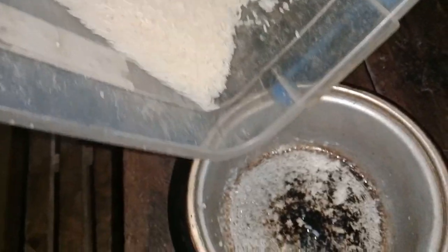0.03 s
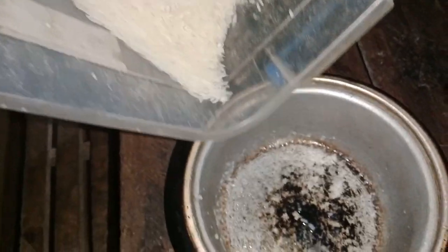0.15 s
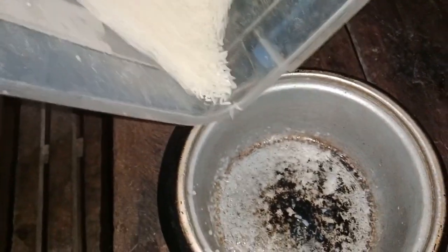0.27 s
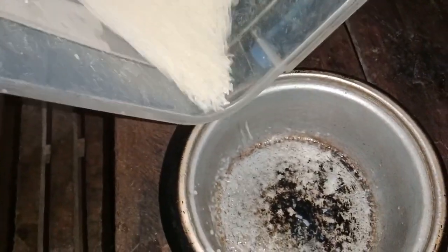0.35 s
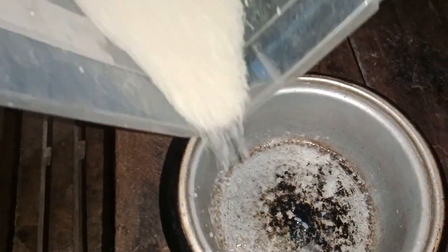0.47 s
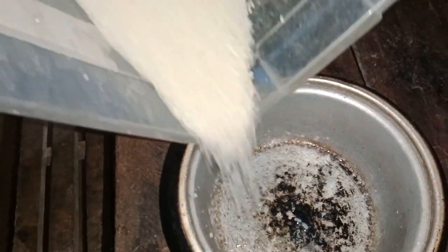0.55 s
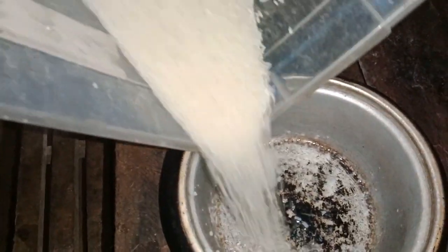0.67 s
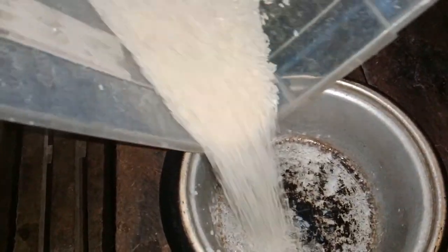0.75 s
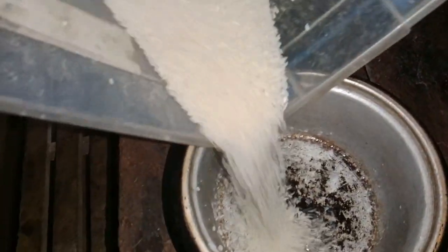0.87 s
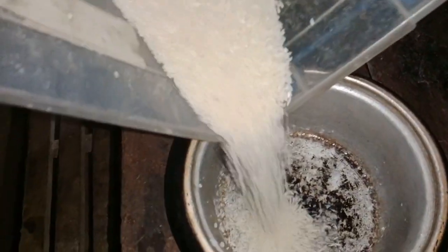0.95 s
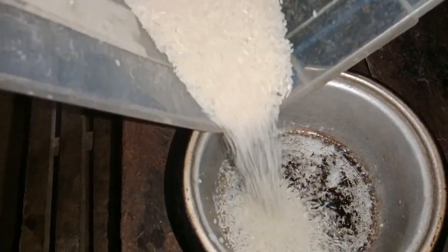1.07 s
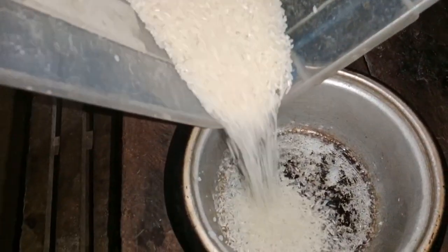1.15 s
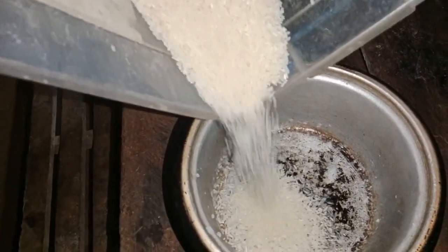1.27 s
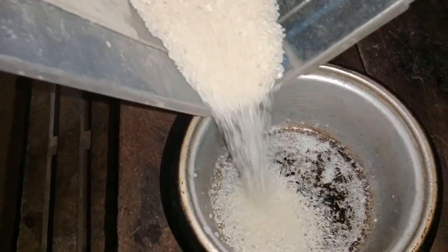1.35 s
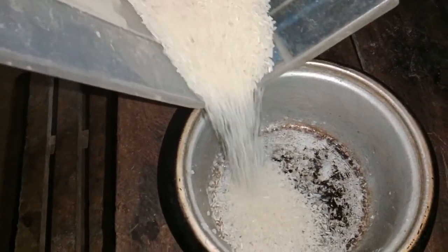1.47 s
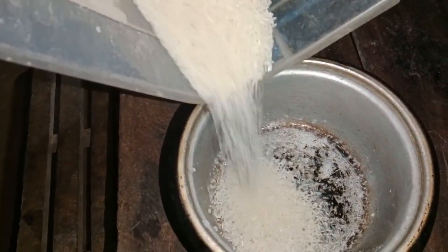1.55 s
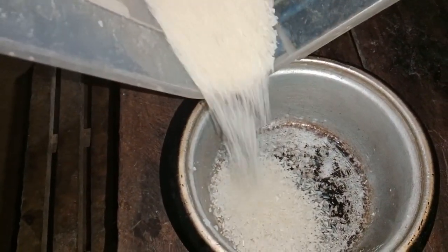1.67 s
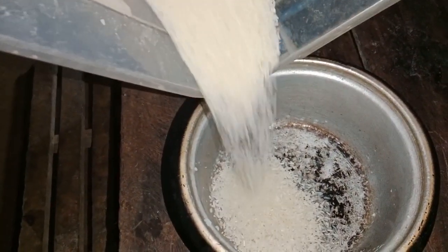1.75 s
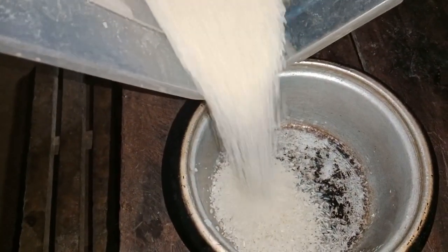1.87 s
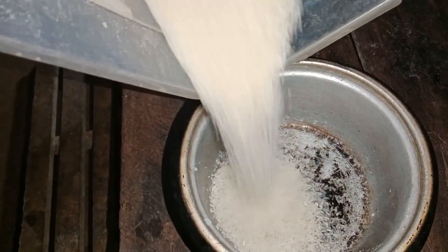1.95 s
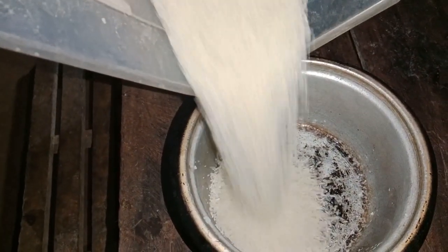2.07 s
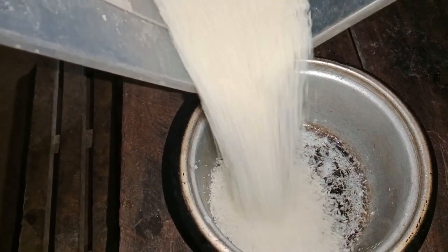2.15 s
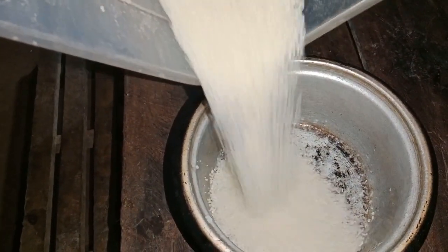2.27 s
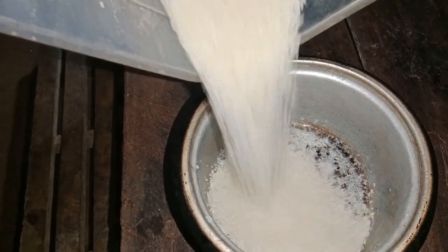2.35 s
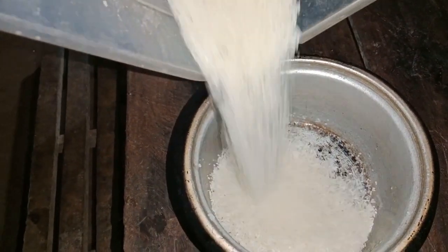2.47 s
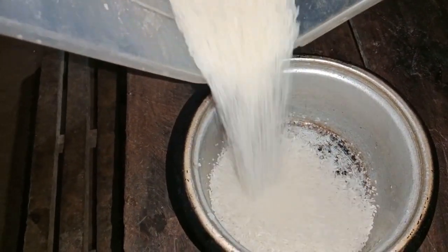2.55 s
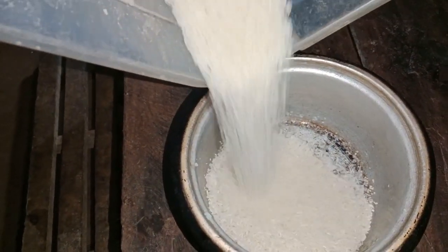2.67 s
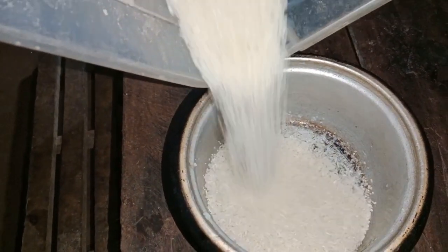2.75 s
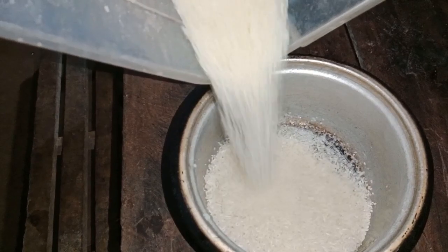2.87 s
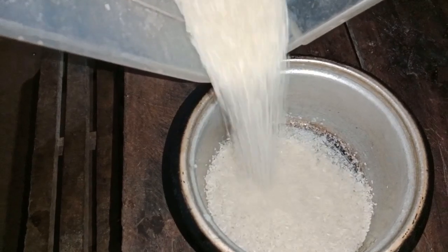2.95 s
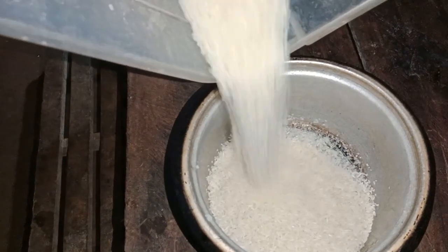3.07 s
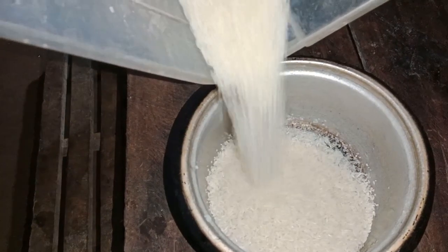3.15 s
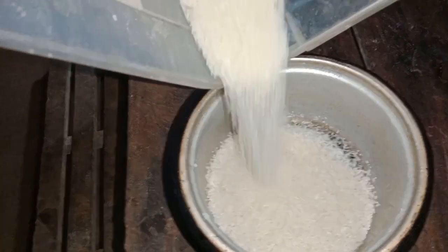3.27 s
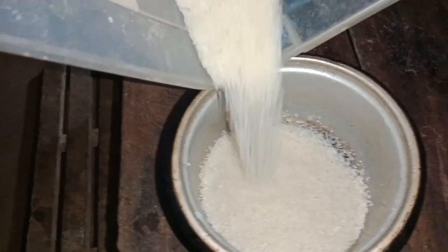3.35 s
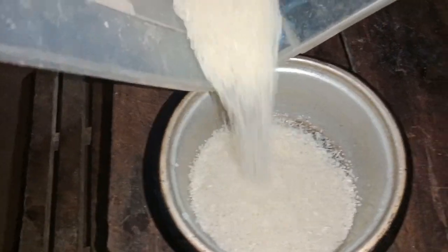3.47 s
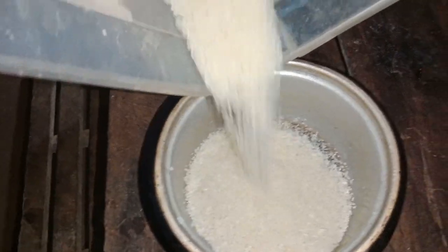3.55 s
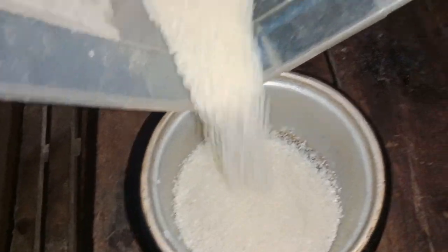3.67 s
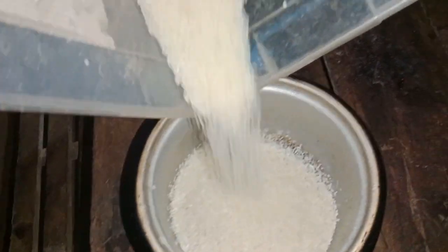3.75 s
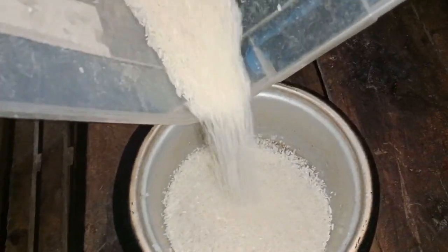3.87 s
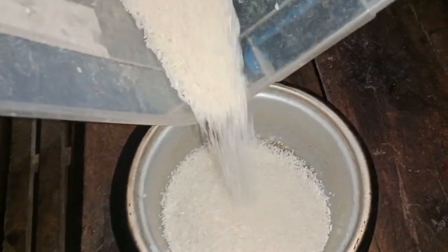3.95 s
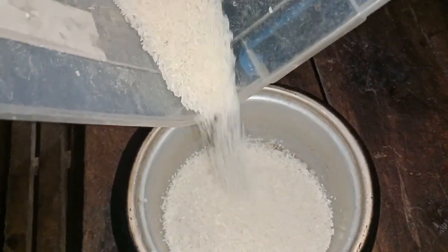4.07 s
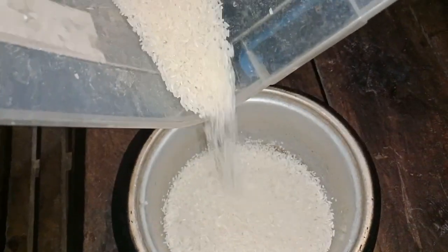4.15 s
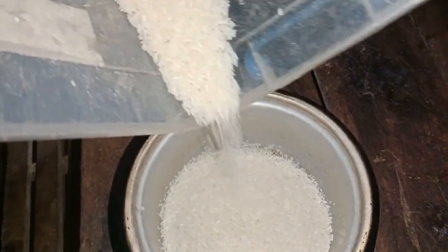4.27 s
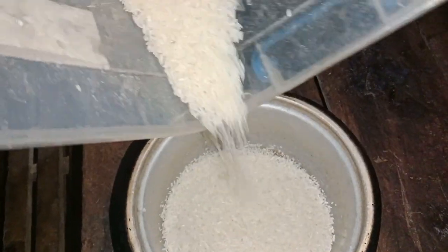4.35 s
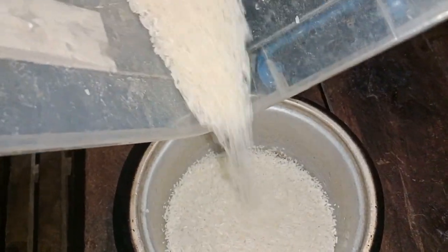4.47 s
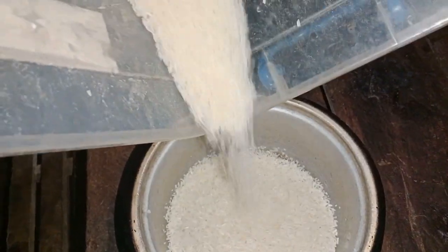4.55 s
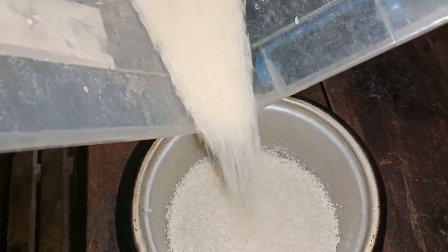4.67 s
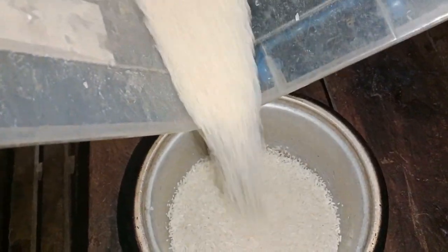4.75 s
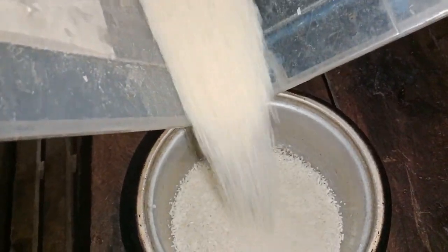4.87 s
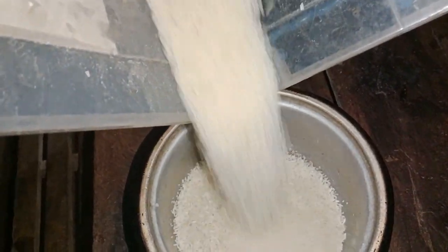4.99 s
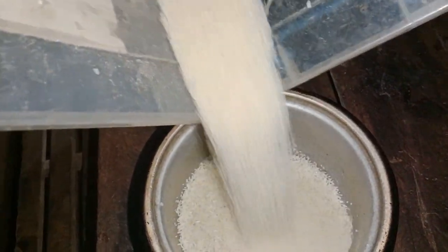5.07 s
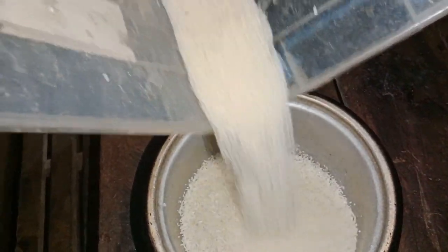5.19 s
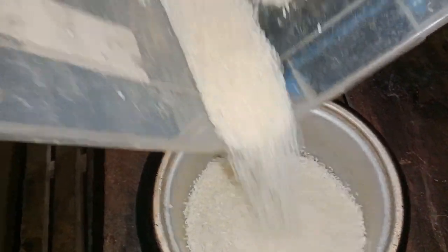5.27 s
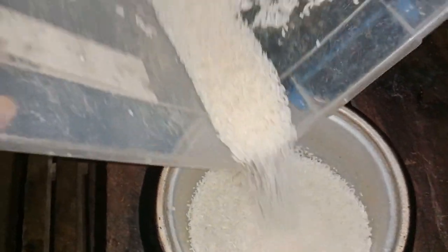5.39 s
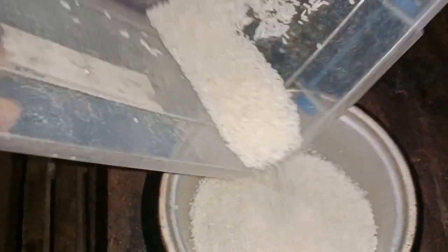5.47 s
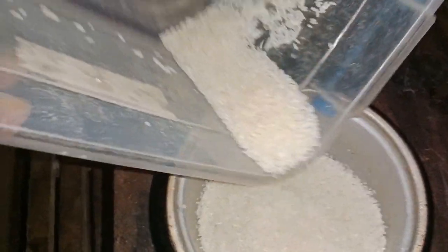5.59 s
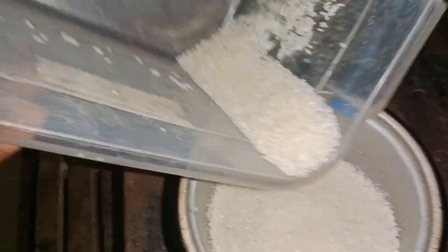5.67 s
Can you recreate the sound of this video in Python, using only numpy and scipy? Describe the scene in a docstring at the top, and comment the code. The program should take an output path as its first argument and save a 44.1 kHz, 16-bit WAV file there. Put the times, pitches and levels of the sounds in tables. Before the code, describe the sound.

Dry rice starts sliding down a plastic tub with a fine swish that swells at about 0.3 seconds, with two tiny, faint tones as the tub tips. The first grains tick on the bare metal of a thin pot around 0.5 seconds, and at 0.7 a full stream lands with a bright, grainy patter. The hiss and rattle continue unevenly, swelling near 1.3 and 2.2 seconds, with light drumming from the plastic and sharp ticks of single grains on the pot. From about 3 seconds the patter is softer, and it thins to a trickle between 4.2 and 4.6. The sliding picks up again, and a hand bumps the tub with a dull knock at 4.8. A last surge of rice pours from 5 to 5.4 seconds, then dies away with a few ticks by 5.7. The sound is close, in a quiet room.

```python
"""Rice poured into a metal pot

Dry rice slides down a tilted plastic tub and pours into a thin metal pot on a wooden table.
Sliding grains hiss in the tub and drum its wall; falling grains patter on the heap, ring the pot
and its air, and single ones tick on bare metal. Two brief tones sound as the tub tips, and the
hand bumps it; a quiet room lies below."""
import sys
import numpy as np
from scipy import signal
from scipy.fft import rfft, irfft
from scipy.io import wavfile

SR = 44100
rng = np.random.default_rng(int(sys.argv[2]) if len(sys.argv) > 2 else 0)


def dump_mix(stems):
    """Bounce the given channels to the path in sys.argv[1] as a 16-bit WAV at rate SR."""
    frames = np.atleast_2d(stems).T  # one column per channel
    limited = np.clip(frames, -1, 1)  # hard clip at full scale
    pcm = np.round(limited * 32767).astype(np.int16)
    wavfile.write(sys.argv[1], SR, pcm)


N = 252472

# rice landing in the pot: (time [s], level [dB])
FALL_LEVELS = [(0.0, -62), (0.17, -51), (0.64, -40), (0.67, -22.5), (0.8, -21), (0.99, -31), (1.35, -27),
               (1.75, -34.5), (2.21, -24.5), (2.52, -27), (2.6, -32.5), (2.96, -36), (3.68, -38),
               (3.9, -38.5), (4.06, -37), (4.25, -44), (4.56, -48), (4.84, -57), (4.97, -35), (5.21, -25),
               (5.35, -29.5), (5.56, -39.5), (5.72, -58)]
# parts drummed by the grains: (time [s], tub wall [dB], pot air [dB], tub floor [dB])
DRUM_LEVELS = [(0.0, -53.5, -70, -45.5), (0.17, -47.5, -64, -50.5), (0.37, -43, -51.5, -42.5),
               (0.59, -49.5, -57.5, -42.5), (0.7, -65.5, -49, -46.5), (1.43, -77.5, -44.5, -46),
               (1.72, -44, -56, -45), (2.04, -44, -43.5, -41.5), (2.63, -52.5, -50, -51),
               (2.83, -52, -65, -46.5), (2.96, -47.5, -54, -48), (4.03, -51.5, -62, -46),
               (4.19, -63, -56, -51), (4.22, -65, -70, -60), (4.4, -80, -80, -67),
               (4.62, -57.5, -80, -51.5), (4.81, -41, -57, -42.5), (5.07, -39.5, -46, -41),
               (5.28, -56.5, -60, -54), (5.51, -74.5, -72, -81), (5.66, -81, -79, -91),
               (5.72, -74, -69, -71)]


def from_db(db):
    return 10 ** (np.asarray(db) / 20)


def unit_rms(x):
    return x / np.sqrt(np.mean(x ** 2) + 1e-20)


def envelopes(rows):
    """One per-sample curve for each column after the time."""
    time_s, *columns = np.transpose(rows)
    return [np.interp(np.arange(N) / SR, time_s, column) for column in columns]


def drift(rate_hz):
    """Slow random wander, RMS 1: noise through two one-pole low-passes."""
    r = np.exp(-2 * np.pi * rate_hz / SR)
    return unit_rms(signal.lfilter([1], [1, -2 * r, r * r], rng.standard_normal(N + SR))[SR:])


def grains(rate_per_s, spread_db, clump_db, clump_hz):
    """Random clicks of uneven size, swelling in clumps; mean power about 1."""
    density = np.clip(rate_per_s / SR, 1e-4, 1)
    sizes = from_db(spread_db * np.minimum(rng.exponential(1, N), 5)) * rng.choice([-1, 1], N)
    clicks = unit_rms(sizes) * (rng.random(N) < density) / np.sqrt(density)
    return clicks * unit_rms(from_db(clump_db * drift(clump_hz)))


def resonate(x, modes, wander_db=0.0):
    """Parallel resonances, power gain about 1; each wanders in level as the grains shift to other spots."""
    out, impulse_response = 0, 0
    for k, (hz, width_hz, level_db) in enumerate(modes):
        r = np.exp(-np.pi * width_hz / SR)
        b = (-1) ** k * from_db(level_db) * (1 - r * r) / 2 * np.array([1, 0, -1])
        a = [1, -2 * r * np.cos(2 * np.pi * hz / SR), r * r]
        out += signal.lfilter(b, a, x) * unit_rms(from_db(wander_db * drift(rate_hz=4.6)))
        impulse_response += signal.lfilter(b, a, signal.unit_impulse(SR))
    return out / np.sqrt(np.sum(impulse_response ** 2))


def ring(clicks, hz, t60_s):
    """One mode: a unit click starts a decaying sine of height 1."""
    r, w = from_db(-60 / (t60_s * SR)), 2 * np.pi * hz / SR
    return signal.lfilter([0, np.sin(w)], [1, -2 * r * np.cos(w), r * r], clicks + 1e-18)


def highpass(x, hz):
    return signal.sosfilt(signal.butter(4, hz, "high", fs=SR, output="sos"), x)


def lowpass(x, hz):
    return signal.sosfilt(signal.butter(4, hz, "low", fs=SR, output="sos"), x)


def tub_slide():
    """Thousands of grains rub down the plastic: a fine hiss, and the panels drum along."""
    # sliding rice: (time [s], hiss [dB], brighter swish [dB])
    slide_levels = [(0.0, -45.5, -42.5), (0.14, -42, -40), (0.29, -30, -22), (0.4, -38.5, -31.5),
                    (0.56, -35.5, -33), (0.64, -42, -37), (0.67, -31, -32), (0.8, -32.5, -35.5),
                    (1.05, -41, -30.5), (1.29, -35, -37), (1.75, -39.5, -37.5), (2.12, -31.5, -35),
                    (2.6, -38.5, -35), (3.44, -39, -38.5), (4.04, -39.5, -32.5), (4.25, -59.5, -46),
                    (4.44, -59, -49), (4.56, -46.5, -39), (4.7, -39.5, -33), (4.97, -29.5, -27),
                    (5.21, -39, -30.5), (5.35, -38, -32.5), (5.46, -52.5, -42), (5.56, -66, -53),
                    (5.72, -69, -60)]
    # resonances of the rubbing and of the tub's parts: (frequency [Hz], width [Hz], gain [dB])
    hiss_modes = [(1506, 125, -5), (2345, 260, -6.5), (2670, 810, -3.5), (3250, 490, 1.5), (3755, 560, 2),
                  (4150, 930, -1), (12100, 25000, -18.5)]
    swish_modes = [(5190, 890, -4.5), (6120, 660, 1), (7100, 710, -2), (8330, 2070, -10.5)]
    wall_modes = [(227, 112, -4), (382, 75, 0.4)]
    panel_modes = [(1007, 82, -6), (1828, 54, 1)]
    floor_modes = [(1130, 175, -6.5), (1293, 80, 5)]
    hiss_db, swish_db = envelopes(slide_levels)
    wall_db, _, floor_db = envelopes(DRUM_LEVELS)
    panel_db = 0.61 * wall_db + 0.37 * hiss_db - 6.5   # small panels feel both load and sliding
    hiss = resonate(grains(14000, spread_db=2, clump_db=1, clump_hz=25.3), hiss_modes, wander_db=0.82)
    swish = resonate(grains(12000, spread_db=3.5, clump_db=1, clump_hz=24.8), swish_modes, wander_db=0.5)
    wall = resonate(grains(3000, spread_db=1.5, clump_db=1, clump_hz=22), wall_modes, wander_db=2)
    panel = resonate(grains(3000, spread_db=4.5, clump_db=3, clump_hz=13), panel_modes, wander_db=2)
    floor = resonate(grains(4000, spread_db=3, clump_db=0.5, clump_hz=22), floor_modes, wander_db=1)
    return (from_db(hiss_db) * highpass(hiss, 1550)
            + from_db(swish_db - 1) * highpass(highpass(swish, 5140), 4600)
            + from_db(wall_db) * highpass(lowpass(wall, 550), 180)
            + from_db(panel_db) * highpass(panel, 610)
            + from_db(floor_db - 0.5) * lowpass(highpass(floor, 800), 2330))


def pot_stream():
    """Falling grains patter on the heap, ring the bare metal and sound the air in the pot."""
    # grains ringing the metal: (time [s], level [dB])
    metal_levels = [(0.0, -45), (0.14, -48), (0.37, -32.5), (0.54, -41), (0.556, -26), (0.58, -39.5),
                    (0.67, -33), (0.8, -31), (1.0, -40), (1.6, -41), (2.2, -38), (2.96, -41), (4.06, -40.5),
                    (4.25, -49), (4.4, -61.5), (4.56, -44.5), (4.84, -36), (5.0, -33.5), (5.35, -43),
                    (5.46, -48), (5.56, -65), (5.72, -69)]
    # resonances of heap, top sparkle, bare metal and pot air: (frequency [Hz], width [Hz], gain [dB])
    heap_modes = [(6430, 560, -8), (7780, 460, -3.5), (8500, 400, -1), (8750, 950, -7), (9960, 1220, -12)]
    sparkle_modes = [(10830, 2500, -1.2), (14000, 1360, -0.9), (15900, 1350, 0.67)]
    metal_modes = [(2040, 180, -4), (2507, 230, -3), (2867, 69, -10.5), (3060, 130, -10.5),
                   (3536, 170, 2.5), (3805, 155, 3), (4320, 270, 1.5), (4715, 44, 1), (5140, 350, -3)]
    air_modes = [(526, 50, -1), (656, 113, 7.5), (800, 43, -12)]
    fall_db, = envelopes(FALL_LEVELS)
    metal_db, = envelopes(metal_levels)
    _, air_db, _ = envelopes(DRUM_LEVELS)
    sparkle_db = 1.094 * fall_db - 9   # a thin trickle lands softly and loses its top first
    impacts = grains(9000, spread_db=3.5, clump_db=2, clump_hz=30.2)
    patter = resonate(impacts, heap_modes, wander_db=0.85)
    sparkle = resonate(impacts, sparkle_modes, wander_db=3)
    metal = resonate(grains(4000, spread_db=3, clump_db=1.5, clump_hz=9.1), metal_modes, wander_db=2.5)
    air = resonate(grains(3000, spread_db=1, clump_db=1.5, clump_hz=32), air_modes, wander_db=3.5)
    return (from_db(fall_db) * highpass(patter, 5600)
            + from_db(sparkle_db) * highpass(sparkle, 9400)
            + from_db(metal_db) * highpass(metal, 1810)
            + from_db(air_db) * lowpass(highpass(air, 380), 810))


def grain_ticks(strays=70, strays_from_s=0.7):
    """A grain lands on the bare metal and bounces twice; each touch strikes the pot's modes differently."""
    # clearest single grains on bare metal: (time [s], level [dB], high-mode gain [dB])
    clear_ticks = [(0.155, -18.5, -15), (0.5451, -11.5, -9), (0.5544, -13, -10), (0.648, -12.5, -10),
                   (0.6625, -6.5, -9), (1.203, -21, -11), (1.3399, -11, -12), (1.6814, -15, -10),
                   (1.893, -23, -12), (2.192, -9, -10), (2.2007, -8, -10), (2.614, -12, -14),
                   (2.664, -7, -14), (2.6744, -16, -12), (2.7183, -9, -13), (2.7552, -11, -12),
                   (2.8054, -14, -9), (2.8399, -18, -10), (2.8654, -18, -12), (2.8826, -15, -12),
                   (2.9901, -17.5, -10), (3.0826, -20, -12), (3.1183, -18, -12), (3.1993, -19.5, -14),
                   (3.3705, -12, -14), (3.379, -14, -12), (3.5548, -15, -13), (3.588, -19, -12),
                   (3.6067, -17, -11), (3.856, -18, -9), (3.8656, -13, -10), (3.8906, -14, -14),
                   (3.917, -15, -9), (3.9533, -12.5, -15), (3.9664, -14, -9), (4.0572, -17.5, -14),
                   (4.0754, -19, -12), (4.1124, -20, -9), (4.1314, -17, -12), (4.155, -12, -13),
                   (4.2098, -15.5, -12), (4.25, -19.5, -12), (4.3136, -20.5, -12), (4.3988, -28, -14),
                   (4.4637, -23, -12), (4.58, -24, -12), (4.9082, -15, -16), (5.0382, -7, -16),
                   (5.1053, -8.5, -17), (5.1183, -11, -16), (5.1474, -8, -18), (5.179, -12, -17),
                   (5.229, -17, -12), (5.2993, -12, -18), (5.42, -10.5, -17), (5.4939, -18.5, -14),
                   (5.5403, -17.5, -14), (5.5983, -18, -16), (5.6058, -18, -15), (5.6501, -37, -12),
                   (5.6874, -29, -20)]
    # bare pot: (frequency [Hz], gain [dB], t60 [s])
    pot_modes = [(4660, -12.5, 0.046), (6000, 2.5, 0.0088), (6700, 0.5, 0.02), (7380, -9.5, 0.0086),
                 (7940, -4, 0.019), (8570, -6, 0.015), (8930, -5, 0.014), (10040, -10.5, 0.0073),
                 (10840, 2.5, 0.0088), (12100, -3, 0.0038), (13300, -4.5, 0.01), (14900, -8, 0.0084),
                 (14600, -2, .006)]
    fall_db, = envelopes(FALL_LEVELS)
    when, softness = rng.random((strays, 2)).T
    stray_s = strays_from_s + when * (N / SR - strays_from_s)
    stream_db = fall_db[(stray_s * SR).astype(int)]
    stray_db = -21 + 0.68 * (stream_db + 35.5) - 5.5 * softness
    stray_high_db = np.full(strays, -10)
    time_s, tick_db, high_db = np.hstack([np.transpose(clear_ticks), [stray_s, stray_db, stray_high_db]])
    low_db = -3.5 - 2.5 * time_s   # low modes weaken as the pot fills
    count = len(time_s)
    lag = rng.random((count, 2))
    # landing and two rebounds: (time [s], gain [dB])
    touches = [(time_s, 0),
               (time_s + 0.0006 + 0.0016 * lag[:, 0], -2.5),
               (time_s + 0.0016 + 0.0018 * lag[:, 1], -16)]
    out = np.zeros(N)
    for hz, mode_db, t60_s in pot_modes:
        clicks = np.zeros(N + SR)
        colour_db = mode_db + (high_db if hz > 10200 else low_db if hz < 6800 else 0)
        for touch_s, touch_db in touches:
            strength = from_db(tick_db + colour_db + touch_db - 5.5 + rng.normal(0, 2.45, count))
            np.add.at(clicks, (touch_s * SR).astype(int), strength * rng.choice([-1, 1], count))
        out += highpass(ring(clicks[:N], hz, t60_s), 0.8 * hz)   # each ring keeps nothing much below its own pitch
    return out


def hand_bumps():
    """Soft knocks on the tub over a lumpy rumble of the grip."""
    # hand shifting on the tub: (time [s], low thud [dB], wall knock [dB])
    bumps = [(0.199, -59, -41), (0.719, -59, -72), (4.687, -53, -44), (4.788, -43, -24.5),
             (4.857, -50, -41), (4.908, -47, -51), (5.019, -47, -48), (5.31, -57, -42), (5.491, -49, -75),
             (5.707, -70, -48)]
    # thud and knock: (frequency [Hz], t60 [s])
    bump_modes = [(78, 0.072), (265, 0.046)]
    # grip rumble: (frequency [Hz], width [Hz], gain [dB])
    grip_modes = [(79, 15, -4.5), (139, 40, -10.5)]
    time_s, *levels_db = np.transpose(bumps)
    palm_push = np.hanning(round(0.0013 * SR)) / (0.0012 * SR)
    grip = grains(300, spread_db=-0.5, clump_db=2, clump_hz=1.7)
    out = from_db(-74.5) * resonate(grip, grip_modes)
    for (hz, t60_s), level_db in zip(bump_modes, levels_db):
        clicks = np.zeros(N)
        clicks[(time_s * SR).astype(int)] = from_db(level_db + 7)
        out += ring(np.convolve(clicks, palm_push)[:N], hz, t60_s)
    return highpass(lowpass(out, 460), 62)


def tipping_tones():
    """Two brief sines swell and fade as the tub tips."""
    # tones: (start [s], length [s], pitch [Hz], level [dB])
    tones = [(0.106, 0.037, 995, -40), (0.194, 0.043, 968, -36)]
    t, out = np.arange(N) / SR, 0
    for start_s, length_s, hz, level_db in tones:
        swell = np.sin(np.pi * np.clip((t - start_s) / length_s, 0, 1))
        out += from_db(level_db) * swell * np.sin(2 * np.pi * hz * t)
    return out


def room(rms_db=-67.5):
    """Steady dull background noise."""
    # room spectrum: (frequency [Hz], relative density [dB])
    spectrum = [(18, -44), (30, 19), (54, 11.5), (124, 7.5), (204, 7.5), (296, 0), (393, -6), (1390, 9.5),
                (5500, -22), (7150, -45), (12100, -120)]
    hz, density_db = np.transpose(spectrum)
    bins_hz = np.arange(N // 2 + 1) * SR / N + 1
    colour = from_db(np.interp(np.log(bins_hz), np.log(hz), density_db))
    return from_db(rms_db) * unit_rms(irfft(rfft(rng.standard_normal(N)) * colour, N))


def scene():
    """Mono mix of rice, tub handling and room."""
    rice = tub_slide() + pot_stream() + grain_ticks()
    return (rice + hand_bumps() + tipping_tones() + room())[None]


def record(dry, bass_hz=55, cutoff_hz=15720):
    """The microphone thins the deepest bass and rounds the peaks; the top is cut steeply."""
    thinned = signal.lfilter(*signal.butter(2, bass_hz, "high", fs=SR), dry)
    rounded = 0.56 * np.tanh(thinned / 0.54)
    return signal.sosfilt(signal.ellip(12, 0.5, 70, cutoff_hz, fs=SR, output="sos"), rounded)


dry = scene()
out = record(dry)
dump_mix(out)
```